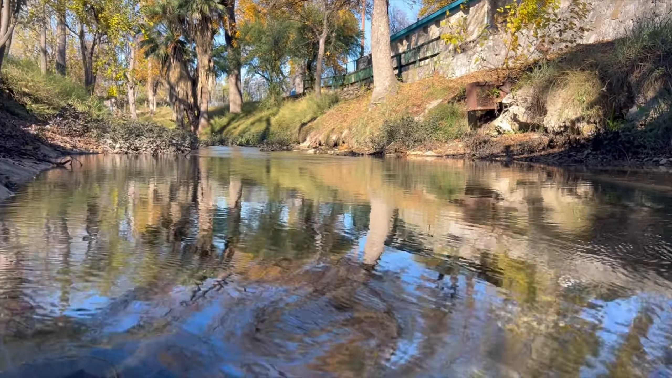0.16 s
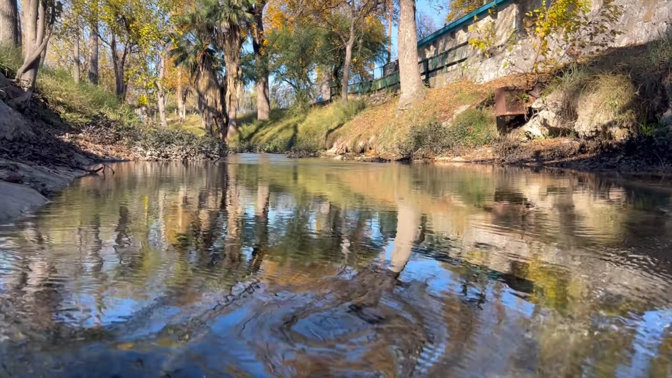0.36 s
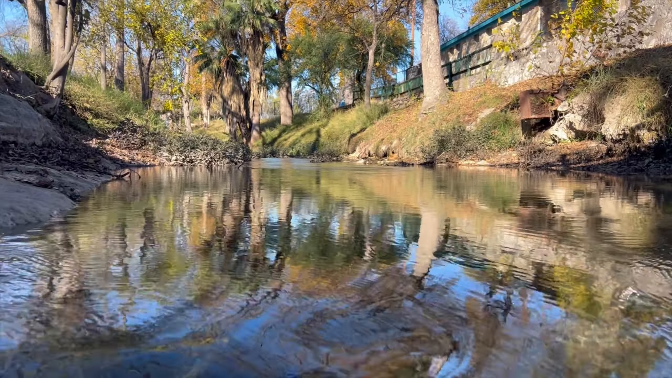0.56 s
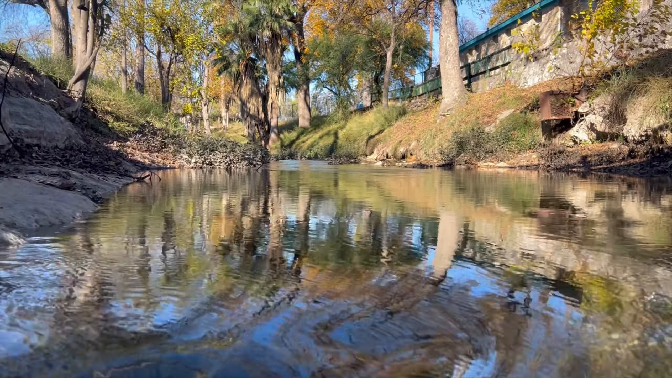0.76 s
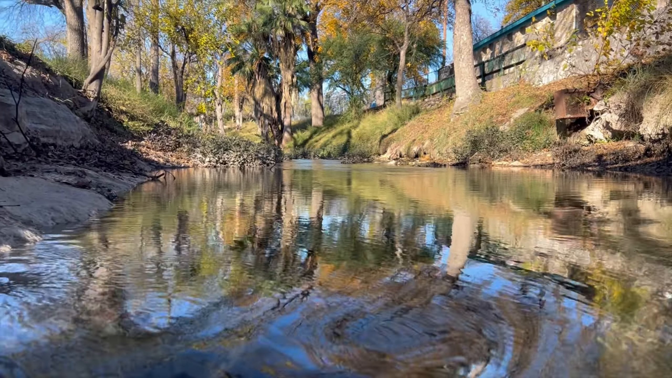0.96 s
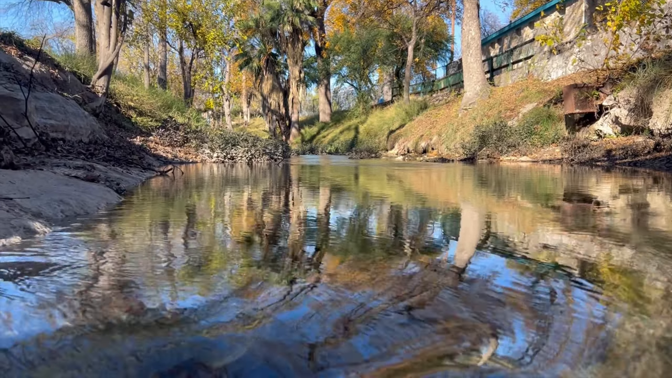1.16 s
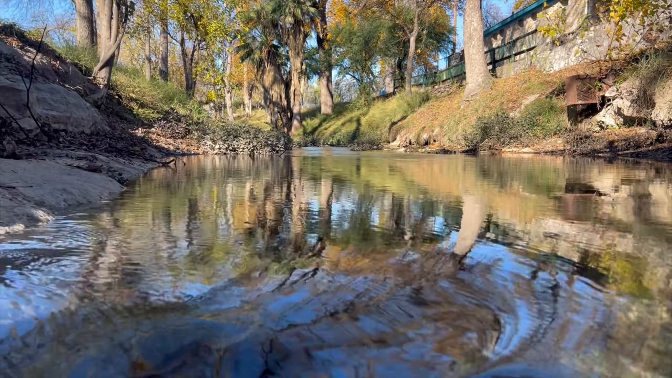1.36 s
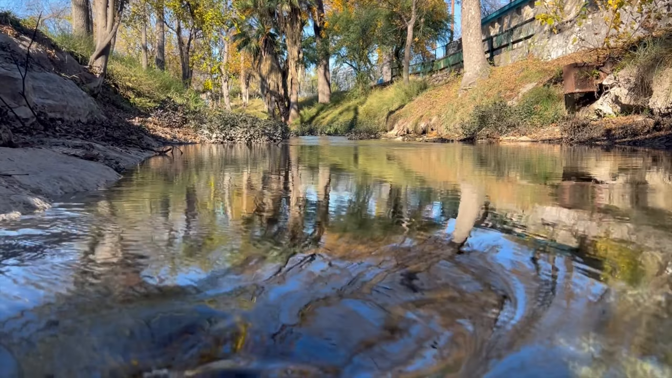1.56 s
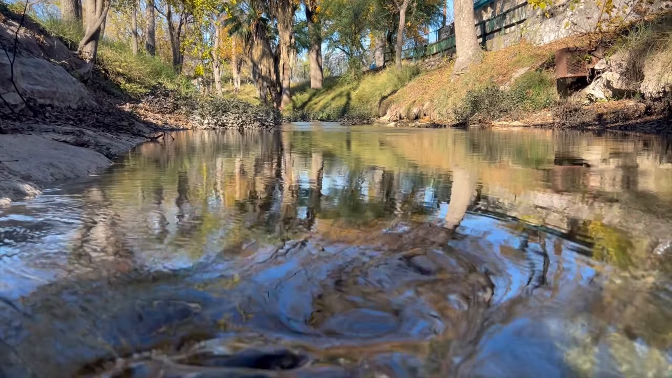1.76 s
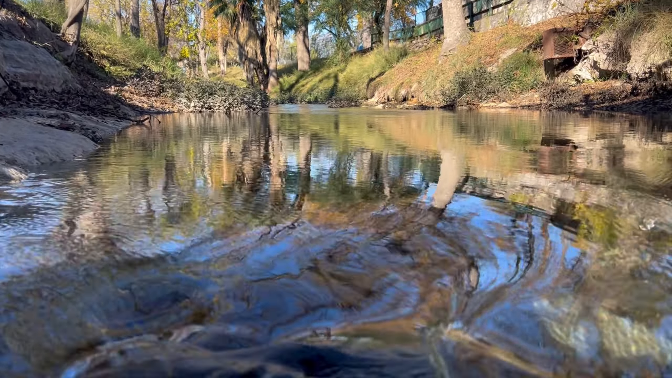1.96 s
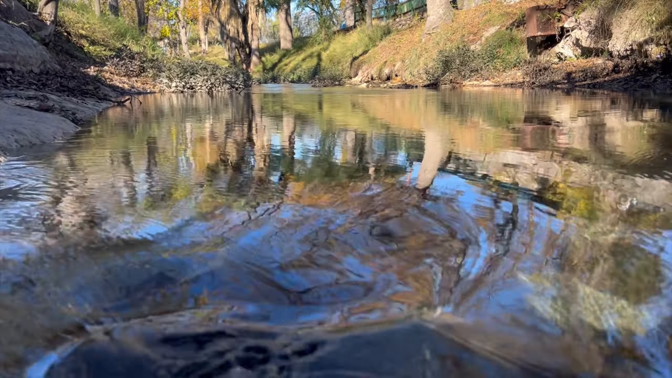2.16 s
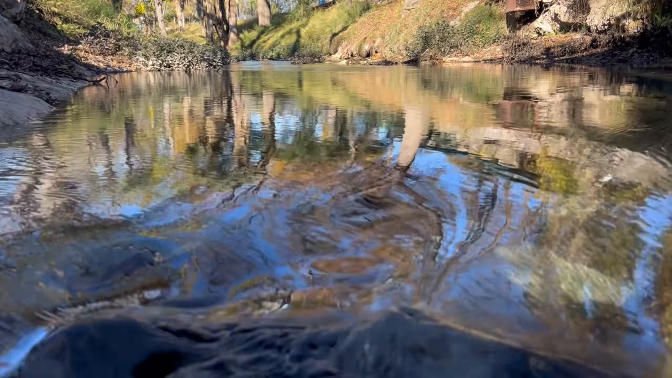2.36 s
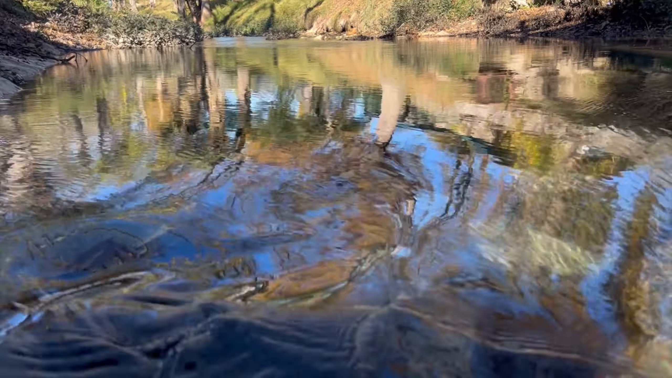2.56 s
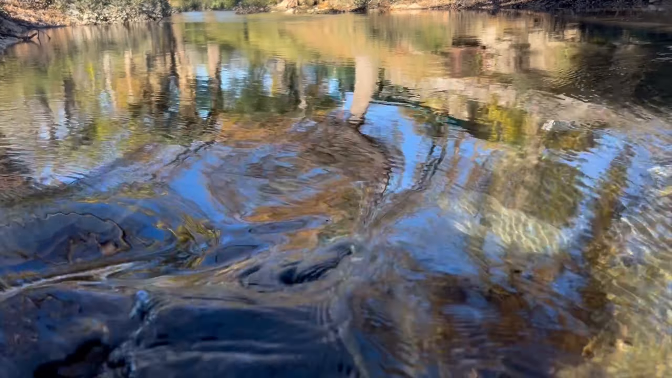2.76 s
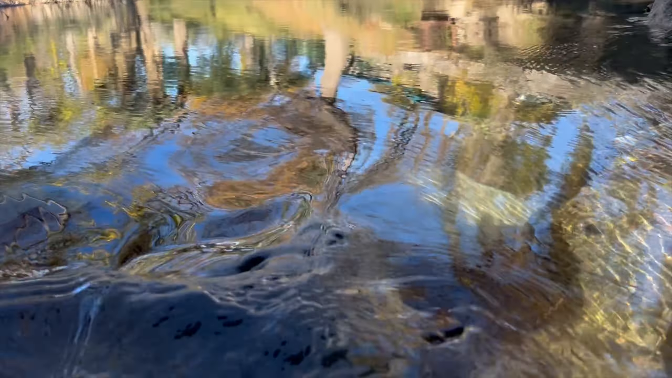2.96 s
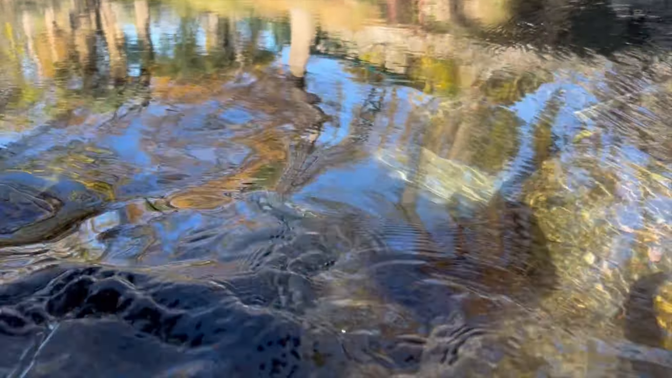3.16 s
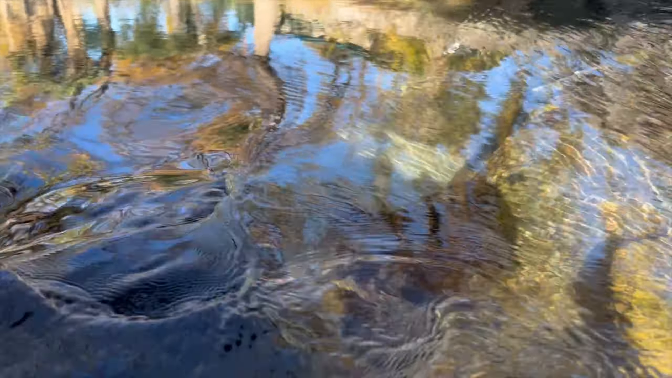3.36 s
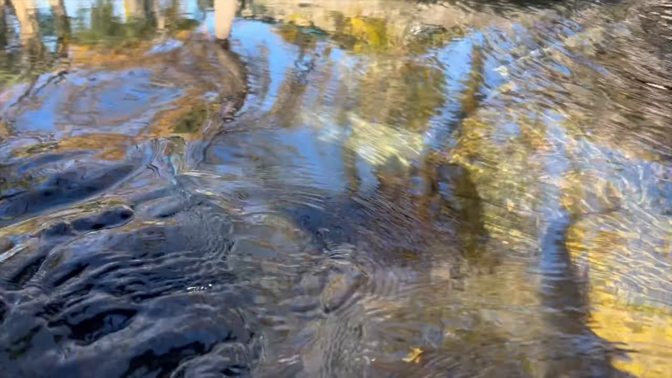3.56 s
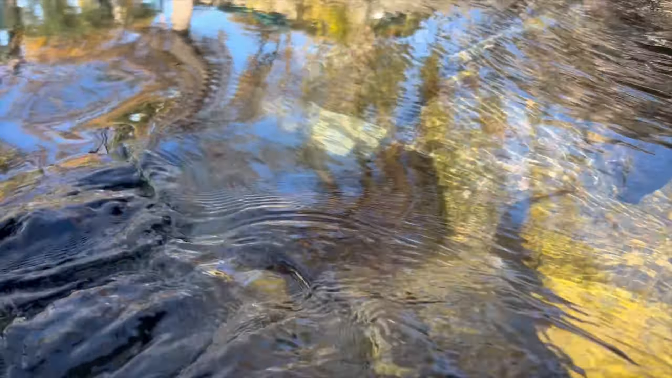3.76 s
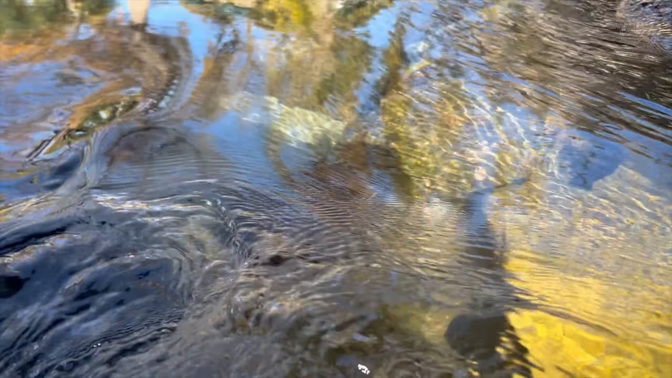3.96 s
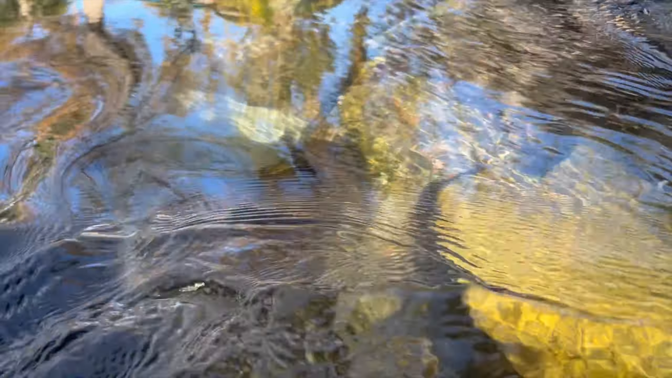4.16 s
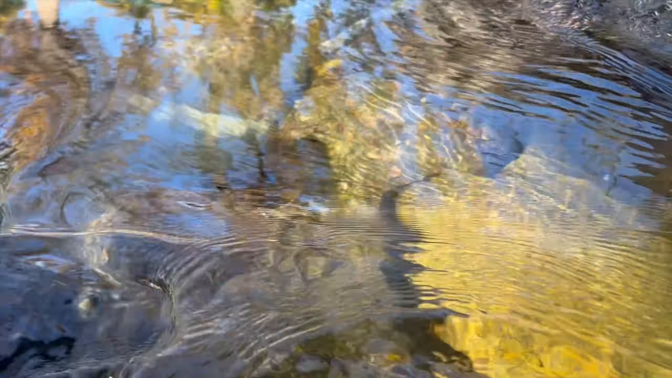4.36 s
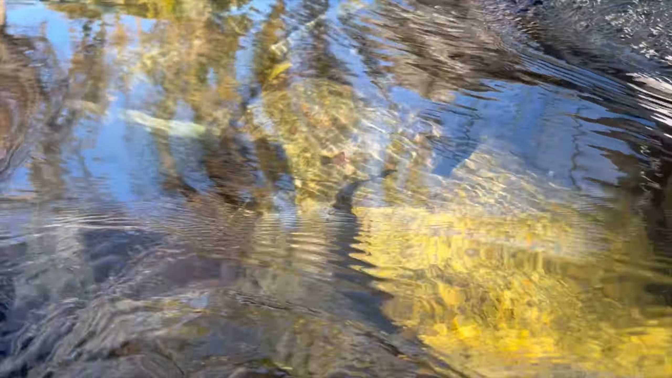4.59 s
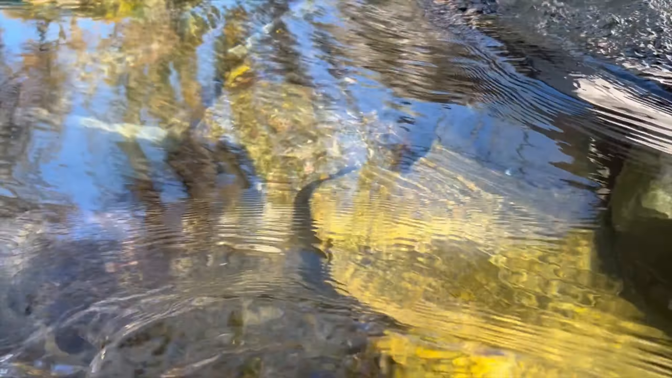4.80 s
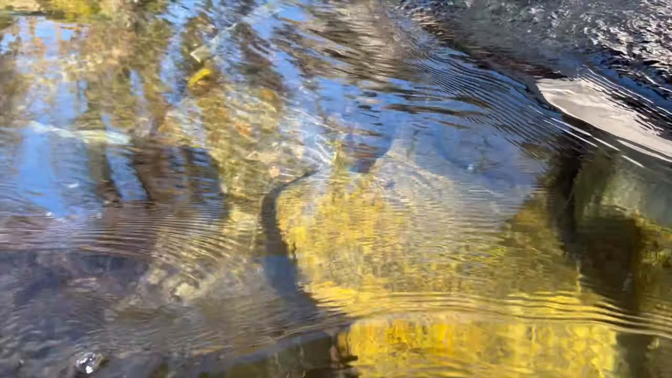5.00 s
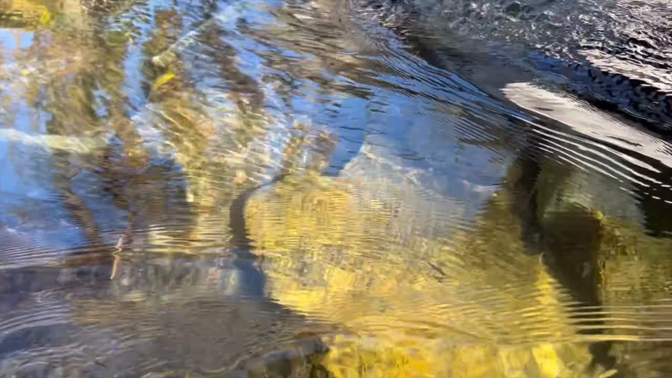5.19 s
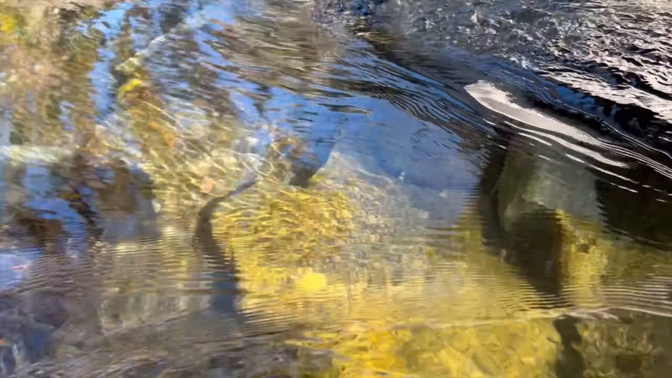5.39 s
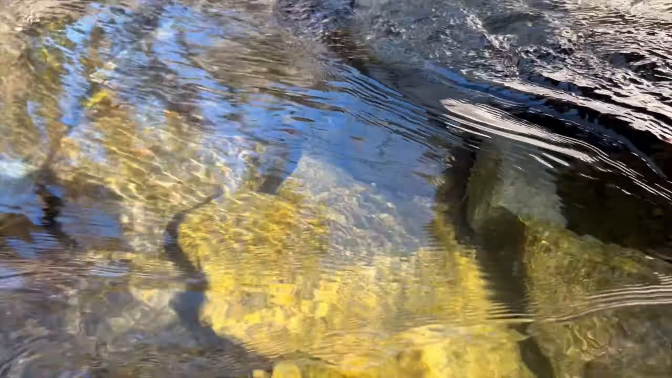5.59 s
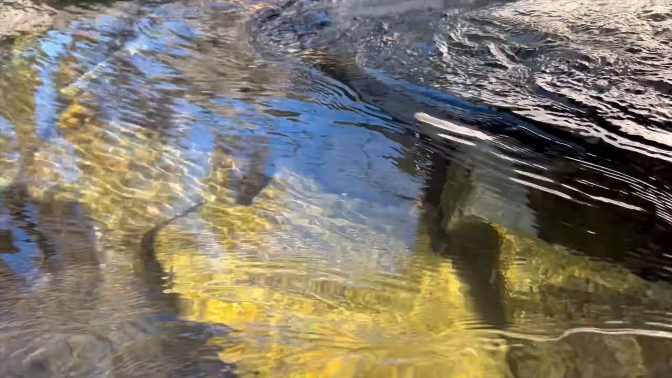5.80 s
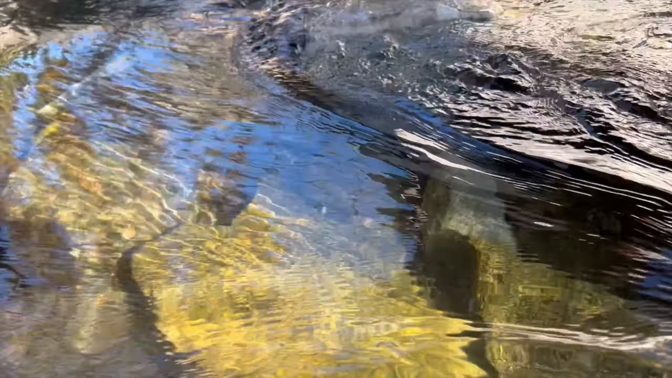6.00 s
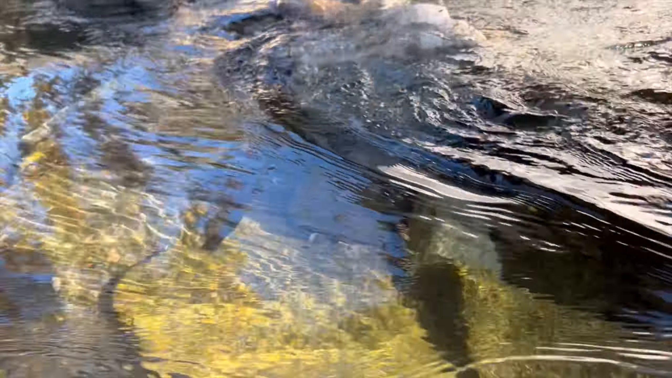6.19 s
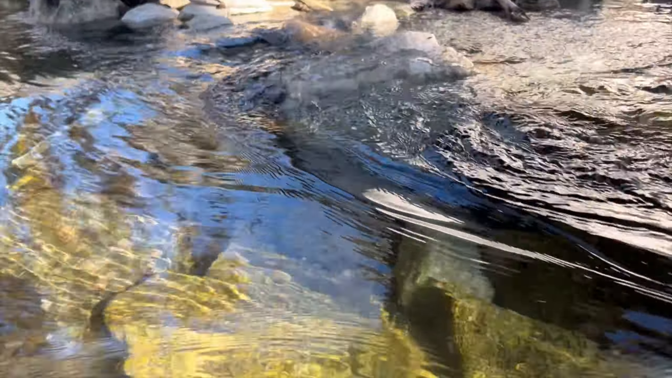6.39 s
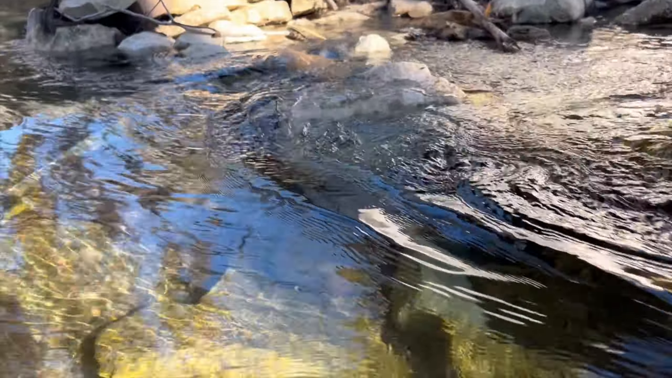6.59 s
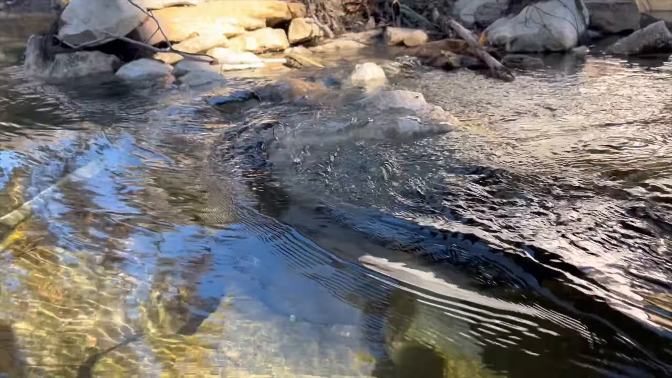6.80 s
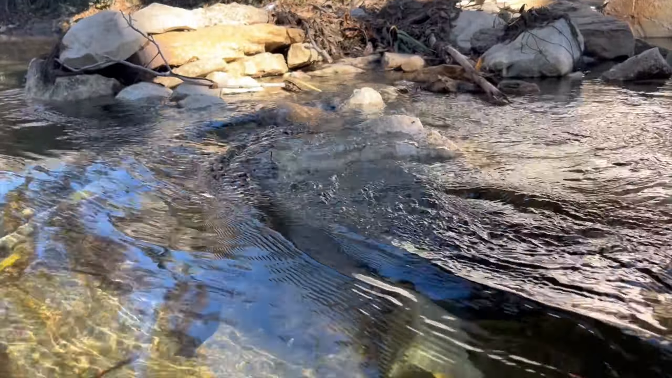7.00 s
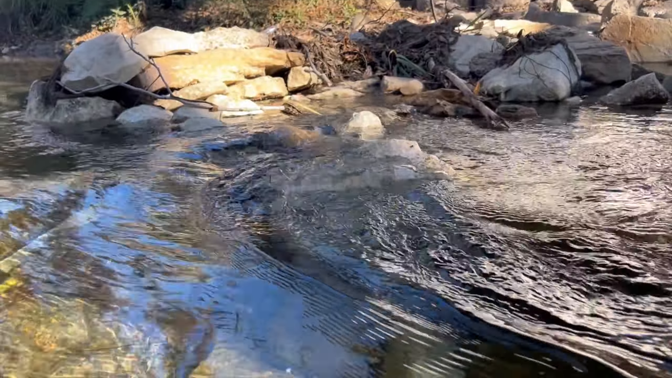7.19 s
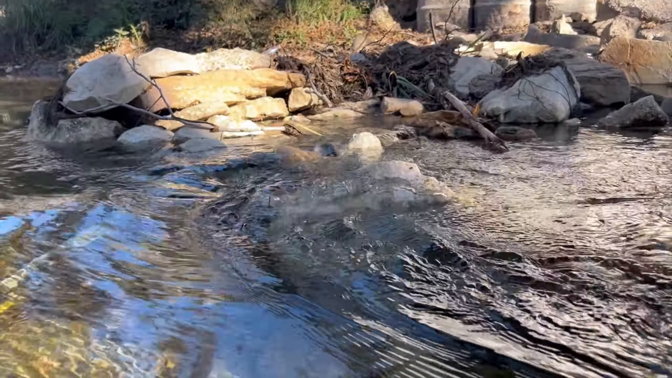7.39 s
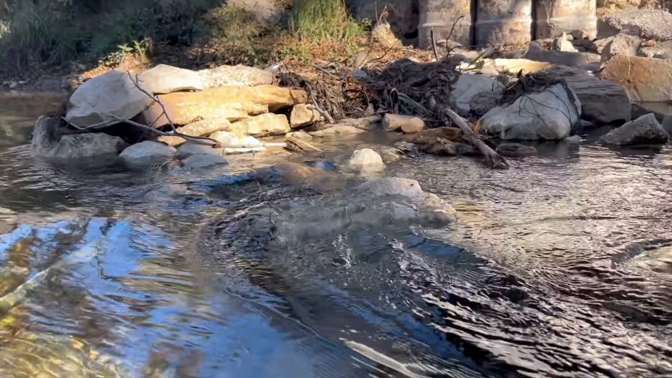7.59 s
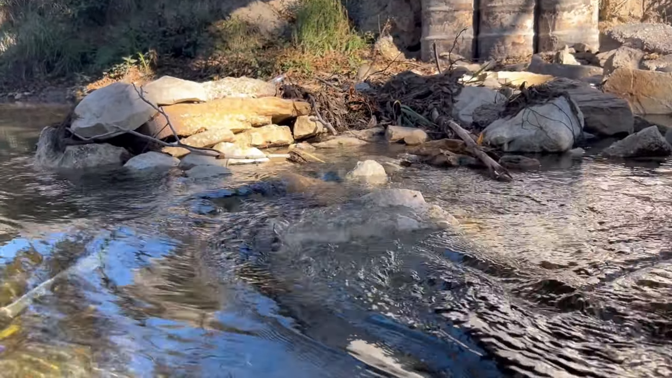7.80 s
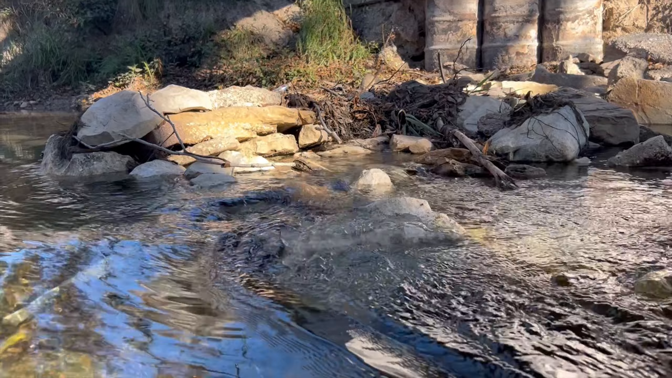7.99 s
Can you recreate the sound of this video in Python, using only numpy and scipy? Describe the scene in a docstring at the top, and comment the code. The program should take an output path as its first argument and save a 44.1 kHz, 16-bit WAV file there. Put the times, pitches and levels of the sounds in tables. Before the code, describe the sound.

An eight-second outdoor stereo scene close to a shallow, rocky creek. From the start, small bubbles pop with crisp falling snaps and short ringing notes, over delicate fizz, midrange babble and a soft, patchy riffle farther off. The first second is fairly sparse; from about 1 to 2.3 seconds the plips and gurgles crowd together, with a rounder plop near 1.7. After a brief lull, more bubbles burst around 2.5 to 3.1. A flurry at 3.6 to 3.9 ends in a prominent hollow glug rising in pitch, to the left. Sharp pops cluster near 4.3, then plinks become more scattered, with brighter ones around 6.9 and 7.5. A distant engine's low throb and road rumble lie underneath, subdued at first, swelling after 3 seconds, staying strong, and revving upward from about 7 until the end. The banks add only a short, diffuse reflection.

```python
"""Bubbles pop and ring and a few air pockets glug where a shallow creek slides over rocks below a hand-held camera.
The nearest bubbles are a falling snap and a decaying note; crowds of small ones burst where the water is busy.
A riffle farther off is a steady wash of patchy noise, and the banks give a short, diffuse answer.
A distant engine, built from exhaust orders over road rumble, revs up and grows louder after three seconds."""
import sys
import numpy as np
from scipy import signal
from scipy.fft import rfft, irfft, next_fast_len
from scipy.io import wavfile
from scipy.ndimage import uniform_filter1d, map_coordinates

SR = 44100
rng = np.random.default_rng(int(sys.argv[2]) if len(sys.argv) > 2 else 0)


def bounce(signal):
    """Save signal as a 16-bit WAV file at the path given by the first command-line argument."""
    frames = np.transpose(np.atleast_2d(signal))
    limited = np.clip(frames, -1, 1)
    pcm = np.round(limited * 32767).astype(np.int16)
    wavfile.write(sys.argv[1], SR, pcm)


N = 355005  # length in samples


def amp(db):
    """Decibels to gain."""
    return 10 ** (np.asarray(db) / 20)


def unit(x):
    """Scale to rms 1."""
    return x / np.sqrt(np.mean(x ** 2) + 1e-20)


def along(points, hz):
    """Read (freq_hz, value) points on a log frequency axis."""
    point_hz, values = np.transpose(points)
    return np.interp(np.log(hz + 1), np.log(point_hz + 1), values)


def curves(rows):
    """One value per sample for each column after the time."""
    time_s, *columns = np.transpose(rows)
    return [np.interp(np.arange(N) / SR, time_s, column) for column in columns]


def wobble(rate):
    """A smooth random curve, rate knots a second."""
    knots = rng.standard_normal(int(N * rate / SR) + 4)
    return map_coordinates(knots, [np.arange(N) * rate / SR])


def filtered(x, response):
    """Multiply the spectrum of x by a response of frequency."""
    size = next_fast_len(N + SR // 2)
    spectrum = rfft(x, size) * response(np.fft.rfftfreq(size, 1 / SR))
    return irfft(spectrum, size)[..., :N]


def add(out, start_s, sound):
    """Mix a stereo sound in at a time, cut off where out ends."""
    start = max(round(start_s * SR), 0)
    room = out[:, start:start + sound.shape[1]]
    room += sound[:, :room.shape[1]]


def placed(wave, pan_db, phase):
    """A complex wave as the two ports hear it, apart in level and phase (radians) at constant power."""
    side = np.array([[.5], [-.5]])  # left, right
    pair = (wave * amp(side * pan_db) * np.exp(1j * side * phase)).imag
    return pair / np.sqrt(np.cosh(pan_db * np.log(10) / 20))


def rush(spectrum, alike, patchy_db):
    """Rushing stereo noise of rms 1: shaped in frequency and left-right likeness, with patches of random gain."""
    noise = signal.stft(rng.standard_normal((2, N)), nperseg=512)[2]
    field = rng.standard_normal(noise.shape[1:])
    field = uniform_filter1d(field, size=4, axis=0)  # across frequency
    field = uniform_filter1d(field, size=7, axis=1)  # across time
    pair = signal.istft(noise * amp(patchy_db * unit(field)), nperseg=512)[1][:, :N]

    def mid_side_gain(hz):
        # the angle sets the mid-to-side balance that gives the wanted likeness
        angle = np.arccos(np.clip(along(alike, hz), -1, 1)) / 2
        return amp(along(spectrum, hz)) * [np.cos(angle), np.sin(angle)]

    mid, side = filtered(pair, mid_side_gain)
    return unit(np.array([mid + side, mid - side]))


def ring(hz, cycles, glide, overshoot=.5, settle=0.71):
    """A bubble's note: it starts sharp as the film opens, settles and dies by 60 dB in so many cycles."""
    age = np.arange(int(cycles / hz * SR) + 2) * hz / SR  # in cycles
    pitch = 1 + overshoot * np.exp(-age / settle) + glide * age / cycles
    envelope = amp(-60 * age / cycles) * (1 - np.exp(-age / 0.059))
    return envelope * np.exp(2j * np.pi * np.cumsum(pitch) * hz / SR)


def pop(start_hz, end_hz, life):
    """The film tears: a snap, life in seconds, that falls in pitch as the hole widens."""
    u = np.linspace(0, 1, int(life * SR) + 4)
    hz = start_hz * (end_hz / start_hz) ** u
    return np.sin(np.pi * u) ** 2 * np.exp(2j * np.pi * np.cumsum(hz) / SR)


def bubble(hz, ring_db, pop_db, pan_db, chance, cycles=40, snap_s=0.00097, phase_spread=0.4):
    """One bubble in stereo: its snap, then its note; chance holds five normal draws."""
    # large bubbles last for more cycles
    life = cycles * np.interp(hz, [1300, 2600], [1.5, 1]) * np.exp(.18 * chance[0])
    note = ring(hz, life, glide=.04 * chance[1], overshoot=.3)
    # a hard snap sweeps down toward the note; a faint one stays in the top octave
    start_hz = min(17000 * np.exp(0.14 * chance[2]), SR / 2)
    end_hz = np.interp(pop_db, [-58, -36], [9000, 6300]) * np.exp(0.087 * chance[3])
    snap = pop(start_hz, end_hz, snap_s)
    phase = phase_spread * chance[4]
    out = np.zeros((2, len(note) + len(snap)))
    add(out, 0, amp(pop_db) * placed(snap, pan_db, phase))
    add(out, snap_s / 2, amp(ring_db) * placed(note, pan_db, phase))
    return out


# the loudest bubbles, right under the camera, levels before the gains below; positive pan is left:
# start_s, pitch_hz, ring_db, pop_db, pan_db
NEAR_BUBBLES = [(0.209, 8500, -75.5, -40, 1), (0.335, 2470, -40.5, -38.5, 3), (0.404, 2030, -42.5, -44, 2),
                (0.696, 744, -37, -42, 7), (0.893, 1650, -43, -66, 5), (1.072, 6700, -42.5, -51.5, -2),
                (1.118, 2450, -73, -54.5, 4), (1.227, 3900, -42.5, -52.5, 6),
                (1.295, 2780, -44.5, -53.5, -4), (1.358, 3020, -39.5, -38.5, -3),
                (1.43, 6000, -41.5, -54.5, 0), (1.441, 3180, -45.5, -44, 0), (1.526, 6900, -45, -40, 2),
                (1.554, 2210, -44.5, -39.5, -0.5), (1.621, 3140, -45.5, -39, -1),
                (1.679, 1190, -30, -46, 2), (1.735, 1010, -37.5, -50, 7), (1.769, 1900, -47.5, -59.5, -3),
                (1.812, 1830, -35, -42.5, -1), (1.852, 3740, -42.5, -42.5, 1), (1.94, 5900, -48, -40, 0),
                (1.99, 1584, -41.5, -40, -1), (2.054, 2830, -44, -53, 0), (2.087, 926, -38.5, -52, 7),
                (2.129, 5840, -43, -45, 3), (2.193, 3100, -43, -36, -2), (2.386, 3470, -51, -51, -2),
                (2.541, 3030, -48, -38.5, 4), (2.679, 3220, -37.5, -51, -2), (2.811, 4600, -40.5, -46, 3),
                (2.846, 1520, -50, -48, 5), (2.866, 6000, -40.5, -61, 2), (2.911, 2640, -36.5, -34.5, -1),
                (3.048, 2530, -50.5, -40.5, 2), (3.118, 868, -33, -58, 2), (3.149, 1620, -42.5, -44.5, 4),
                (3.652, 1050, -39.5, -42, 10), (3.663, 2480, -38, -33, 9), (3.705, 2530, -37, -36, 5),
                (3.779, 6000, -58, -35, 1), (3.858, 3660, -41.5, -39.5, 1), (3.897, 716, -29, -61, 13),
                (3.909, 2450, -42.5, -64, 10), (4.171, 3230, -40, -39, 1), (4.325, 3400, -46, -31, 3.5),
                (4.331, 4300, -52, -31, 3), (4.353, 4000, -40, -50, 3), (4.376, 4430, -36.5, -31, 1),
                (4.675, 2060, -49, -41, 0.5), (4.771, 3700, -41.5, -39, 0), (4.98, 4860, -45.5, -38, 1),
                (5.186, 1480, -44, -55.5, 0), (5.416, 4400, -46, -46, 12), (5.436, 1056, -41, -47, 3),
                (5.69, 7660, -61, -38, 1), (5.999, 3320, -41.5, -39.5, 2), (6.007, 6940, -50, -44, 0),
                (6.327, 8000, -70, -43.5, 1), (6.501, 2390, -46, -60, 0.5), (6.531, 2224, -37, -40, 1.5),
                (6.825, 8200, -55, -39.5, 0), (6.866, 9300, -36.5, -39, 2), (6.898, 2370, -46.5, -44.5, 9),
                (7.093, 2400, -44.5, -62.5, -6), (7.284, 4870, -43, -41.5, 4), (7.508, 3070, -43, -39.5, 3),
                (7.521, 2080, -36.5, -39, -3.5), (7.57, 4550, -33, -34.5, 2.5)]


def near_bubbles(ring_gain_db=2, pop_gain_db=0):
    """The bubbles that burst right under the camera, each a torn film and a ringing note."""
    out = np.zeros((2, N))
    chances = rng.standard_normal((len(NEAR_BUBBLES), 5))
    for (start_s, hz, ring_db, pop_db, pan_db), chance in zip(NEAR_BUBBLES, chances):
        add(out, start_s, bubble(hz, ring_db + ring_gain_db, pop_db + pop_gain_db, pan_db, chance))
    return out


# air pockets that rise to the surface, the rise being over one life; positive pan is left:
# start_s, start_pitch_hz, level_db, life_s, rise_octaves, pan_db
AIR_POCKETS = [(1.412, 992, -50, 0.042, 0.83, 1), (3.896, 803, -21.5, 0.026, 0.94, 10),
               (4.52, 813, -39, 0.026, 0.73, 2), (4.551, 1890, -42.5, 0.012, 0.48, 0),
               (4.675, 946, -43.5, 0.021, 0.94, -3), (7.015, 1370, -40, 0.012, 0.71, 4)]


def glugs():
    """An air pocket sings higher and higher as it nears the surface."""
    out = np.zeros((2, N))
    for start_s, start_hz, level_db, life_s, octaves, pan_db in AIR_POCKETS:
        t = np.arange(int(1.5 * life_s * SR)) / SR
        u = t / life_s
        swell = (1 - np.exp(-t / 0.0029)) * amp(-19 * u ** 3)
        hz = start_hz * 2 ** (octaves * u ** 1.3)
        wave = swell * np.exp(2j * np.pi * np.cumsum(hz) / SR)
        add(out, start_s, amp(level_db) * placed(wave, pan_db, 0))
    return out


# wavelets that fold over and trap a cluster of alike bubbles, pitch and level being the middle of the cluster:
# start_s, length_s, pitch_hz, level_db
FOLDING_WAVELETS = [(0, .26, 1734, -58.5), (0.285, .14, 2040, -61.5), (0.68, .035, 1800, -51),
                    (0.691, .03, 867, -47.5), (0.871, .03, 1790, -57.5), (1.075, .05, 2420, -54),
                    (1.293, .04, 1650, -47.5), (1.727, .12, 2000, -61.5), (1.981, .03, 1620, -50.5),
                    (2.122, .03, 1390, -51.5), (2.125, .025, 2040, -52), (3.992, .02, 1790, -54),
                    (5.19, .04, 1510, -51), (5.41, .04, 1085, -57.5), (6.914, .05, 752, -50.5),
                    (7.56, .06, 4500, -57)]


def gurgles(per_second=260, spread_db=3, pitch_spread=0.022):
    """Each cluster is a quick jumble of bubbles of nearly one size."""
    out = np.zeros((2, N))
    chances = rng.standard_normal((len(FOLDING_WAVELETS), 100, 4))
    for (start_s, length_s, hz, level_db), draws in zip(FOLDING_WAVELETS, chances):
        for k, draw in enumerate(draws[:int(length_s * per_second) + 1]):
            note = ring(hz * np.exp(pitch_spread * draw[0]), 51, glide=0.022, overshoot=0.3)
            gain = amp(level_db + spread_db * draw[2])
            add(out, start_s + (k + .5 * draw[1]) / per_second, gain * placed(note, 0, draw[3]))
    return out


# how busy the water is close by, between flurries: time_s, level_db
TRICKLE_LEVEL = [(0, -66), (.55, -73), (.85, -73), (1.05, -65), (1.75, -67.5), (2.1, -65.5), (2.42, -74),
                 (2.6, -66), (3.5, -72.5), (3.7, -62.5), (4.03, -73), (4.6, -65.5), (5.85, -71),
                 (6.65, -74), (6.85, -66), (7.35, -66), (7.75, -71), (8.05, -68)]


def busy(flurry_db=-31, flurry_s=.042):
    """How busy the water is, in dB: the slow trickle plus a flurry around each near bubble, set by its pop."""
    trickle_db, = curves(TRICKLE_LEVEL)
    t = np.arange(N) / SR
    power = amp(trickle_db) ** 2
    for start_s, _, _, pop_db, _ in NEAR_BUBBLES:
        near = slice(*np.searchsorted(t, [start_s - 3 * flurry_s, start_s + 3 * flurry_s]))
        power[near] += amp(pop_db + flurry_db) ** 2 * np.exp(-((t[near] - start_s) / flurry_s) ** 2)
    return 10 * np.log10(power)


def bursts(busy_db, count, centre_hz, pitch_spread, ring_db, pop_db, spread_db):
    """Bubbles burst at random, more often and louder in busy water; the harder the pop, the weaker the note."""
    odds = np.cumsum(amp(.6 * busy_db + 5 * wobble(28)))
    starts = np.searchsorted(odds / odds[-1], rng.random(count))
    out = np.zeros((2, N))
    for i, draw in zip(starts, np.clip(rng.standard_normal((count, 9)), -2, 2)):
        hz = min(centre_hz * np.exp(pitch_spread * draw[0]), 9000)
        level_db = busy_db[i] + spread_db * draw[1]
        note_db = level_db + ring_db - 7.9 * draw[2]
        snap_db = level_db + pop_db + 4.94 * draw[2]
        add(out, i / SR, bubble(hz, note_db, snap_db, 2.0 * draw[3], draw[4:]))
    return out


def fizz(busy_db):
    """A crowd of tiny bubbles, mostly snap."""
    return bursts(busy_db, count=700, centre_hz=5590, pitch_spread=.32, ring_db=3, pop_db=7.5, spread_db=6.0)


def plinks(busy_db):
    """Fewer, larger and louder bubbles, each a snap and a note, mostly a little lower than the fizz."""
    return bursts(busy_db, count=90, centre_hz=4330, pitch_spread=.38, ring_db=11.0, pop_db=16, spread_db=-0.5)


def babble(count=1800, centre_hz=1700, level_db=-60, spread_db=3, tilt_db=-5):
    """Many middling bubbles ring among the rocks farther off; they fade as the camera turns away."""
    out = np.zeros((2, N))
    starts_s = rng.random(count) * N / SR
    for start_s, draw in zip(starts_s, np.clip(rng.standard_normal((count, 6)), -2, 2)):
        octave = .5 * draw[0]
        facing_db = np.interp(start_s, [2.2, 3.4], [1.5, -1.5])
        cycles = 48 * np.exp(0.42 * draw[1])
        note = ring(centre_hz * 2 ** octave, cycles, glide=0.13 + 0.2 * draw[2], overshoot=0.016)
        gain = amp(level_db + facing_db + spread_db * draw[3] + tilt_db * octave)
        add(out, start_s, gain * placed(note, 3 * draw[4], 1.0 * draw[5]))
    return out


# how far the left channel leads the right: freq_hz, lead_radians
LEFT_LEAD = [(300, 0), (700, 1.5), (1200, 1.83), (2100, -0.87), (4500, 1.89), (7000, 1.1), (9000, -3.5),
             (12000, -1.7), (15000, 2.5)]


def stereo_phase(water):
    """The near water gets a left-right phase lead that varies with frequency."""
    side = np.array([[.5], [-.5]])
    return filtered(water, lambda hz: np.exp(1j * side * along(LEFT_LEAD, hz)))


# how long the answer of the banks takes to fall by 60 dB: freq_hz, t60_s
BANK_DECAY = [(500, 0.032), (2000, 0.24), (12000, 0.026)]


def banks(x):
    """A short, diffuse answer from the rocks and banks: noise that decays at its own rate in each band."""
    hz, t, noise = signal.stft(rng.standard_normal((2, SR // 3)), SR, nperseg=256)
    decay = amp(-60 * t / along(BANK_DECAY, hz)[:, None])
    tail = signal.istft(noise * decay, SR, nperseg=256)[1]
    return signal.fftconvolve(x, tail / np.linalg.norm(tail[0]), axes=1)[:, :N]


# level of the riffle before the overall gain below: time_s, level_db
WASH_LEVEL = [(0, -54), (.87, -56.5), (1.57, -54.5), (2.29, -55.5), (4.2, -51.5), (5.2, -54.5),
              (7.3, -51.5), (8.05, -52)]
# relative spectrum of the wash: freq_hz, density_db
WASH_SPECTRUM = [(150, -10.5), (300, 1.5), (450, 0), (700, 3.5), (1050, 2.5), (1500, -5.5), (2100, -15.5),
                 (3000, -27), (4500, -30.5), (7000, -67), (12000, -37.5), (16000, -45.5)]
# relative spectrum of the spray: freq_hz, density_db
SPRAY_SPECTRUM = [(1500, 4), (2800, 8.5), (4500, 4), (7500, 1.5), (12000, -2.5), (16000, -17.5)]
# how alike left and right are, 1 the same and -1 opposite: freq_hz, likeness
RIFFLE_LIKENESS = [(250, 1), (450, -0.59), (800, -0.043), (1400, -0.33), (2400, 0.95), (5000, -0.015),
                   (8000, 0.94), (13000, 0.5)]


def riffle(busy_db, level_db=1, spray_db=-10, spurt_db=3.0):
    """The blended wash of the broken water, and a soft spray that spurts and is louder when the water is busy."""
    wash_db, = curves(WASH_LEVEL)
    wash_gain = amp(wash_db + level_db + .4 * wobble(9.9))
    wash = wash_gain * rush(WASH_SPECTRUM, RIFFLE_LIKENESS, patchy_db=2.04)
    spurt_gain = amp(spurt_db * wobble(35))
    spurts = unit(spurt_gain * rush(SPRAY_SPECTRUM, RIFFLE_LIKENESS, patchy_db=-2.5))
    return wash + amp(busy_db + spray_db) * spurts


# resonances (positive) and dips (negative) of the exhaust: centre_hz, width_hz, gain_db
EXHAUST_PIPE = [(59.4, 7.9, 5.5), (68.5, 5.3, 5.5), (82.1, 13.8, -7.5), (94.7, 9.1, 8), (123.7, 12, 6.5),
                (145.2, 11, 3), (179.36, 7.6, 11.5), (214.5, 95, -14.5), (366.8, 14.4, 13.5), (406, 14, 13),
                (495, 202, -11.5), (704, 50, 6)]


def pipe_db(hz):
    """Gain in dB of the exhaust at hz, the sum of its peaks and dips."""
    return sum(db / (1 + (2 * (hz - centre) / width) ** 2) for centre, width, db in EXHAUST_PIPE)


# the engine's rate before a slight random waver: time_s, cycles_per_s
ENGINE_SPEED = [(0, 16.4), (.6, 15), (1.3, 12.6), (1.8, 13.5), (2.4, 12.8), (3.1, 13), (3.5, 14.6),
                (4, 16.2), (4.6, 17.4), (5.2, 17.7), (5.7, 17.75), (6.1, 18.1), (6.5, 18.65), (6.9, 18.1),
                (7.2, 19.3), (7.5, 21.3), (7.8, 23.6), (8.05, 24.7)]
# the engine under load, before the orders' own levels and the road gain: time_s, exhaust_db, road_rumble_db
ENGINE_LEVEL = [(0, -45, -57), (.8, -51, -58), (2.85, -50.5, -58.5), (3.5, -40.5, -54), (4.7, -38, -53.5),
                (5.9, -35, -54), (6.9, -35, -52), (7.5, -34.5, -48.5), (8.05, -36, -49)]
# exhaust orders before the pipe colours them, the 4th and 5th strongest: multiple_of_cycle_rate, level_db
EXHAUST_ORDERS = [(2, -17.5), (3, -10.5), (4, 3), (5, 2.5), (6, -8), (7, -11), (8, -7.5), (9, -16.5),
                  (10, -4.5), (11, -15.5), (12, -12.5), (14, -21.5), (17, -27), (20, -26.5), (23, -28.5),
                  (35, -33), (39, -31.5)]
# relative spectrum of the road rumble: freq_hz, density_db
ROAD_SPECTRUM = [(20, -26.5), (35, -24), (52, 0.5), (75, 4.5), (110, -1), (160, -3.5), (220, -9),
                 (300, -17), (450, -19), (750, -25.5), (1300, -64)]


def engine(road_db=13.5, phase_scatter=1.0, waver_db=0.55):
    """Exhaust orders on one crankshaft, roughly in step to throb once a cycle, over a dull road rumble."""
    speed, = curves(ENGINE_SPEED)
    exhaust_db, rumble_db = curves(ENGINE_LEVEL)
    crank = 2 * np.pi * np.cumsum(speed * (1 + .002 * wobble(7))) / SR
    exhaust = np.zeros(N)
    for k, order_db in EXHAUST_ORDERS:
        k = round(k)
        # an order swells while it passes through a resonance; the high ones waver most
        gain = amp(order_db + pipe_db(k * speed) + waver_db * np.sqrt(k) * wobble(5))
        phase = phase_scatter * rng.standard_normal()  # radians
        exhaust += gain * np.sqrt(2) * np.cos(k * crank + phase)
    road_likeness = [(60, 0.87), (130, 0.81), (280, 0.59), (500, 0.77), (800, 0.15)]  # freq_hz, likeness
    road = rush(ROAD_SPECTRUM, road_likeness, patchy_db=1.0)
    return amp(exhaust_db) * exhaust + amp(rumble_db + road_db) * road


def scene(banks_db=-12):
    """Near water with its answer from the banks, the riffle farther off and the distant engine."""
    busy_db = busy()
    water = near_bubbles() + glugs() + gurgles() + fizz(busy_db) + plinks(busy_db) + babble()
    water = stereo_phase(water)
    return water + amp(banks_db) * banks(water) + riffle(busy_db) + engine()


# the microphone's colour: freq_hz, gain_db
MICROPHONE_COLOUR = [(8000, -0.5), (9200, 0), (10000, -10), (11000, 0), (12300, 0.5), (13800, 0.5),
                     (15000, 4), (16000, -23.5)]


def record(dry, top_hz=15800):
    """The microphone port has a notch and a peak in the top octave; nothing is kept above the band limit."""
    return filtered(dry, lambda hz: amp(along(MICROPHONE_COLOUR, hz)) * (hz < top_hz))


dry = scene()
out = record(dry)
bounce(out)
```